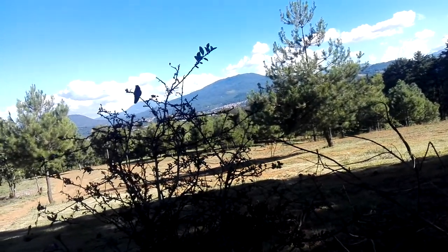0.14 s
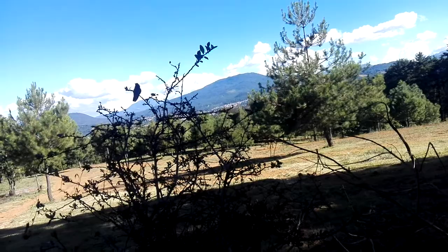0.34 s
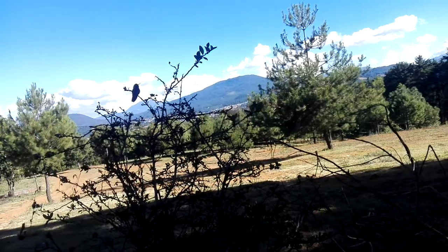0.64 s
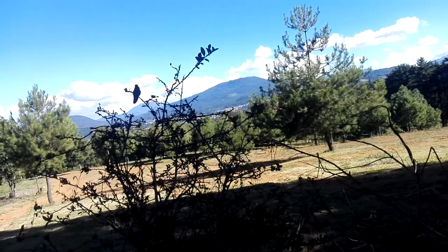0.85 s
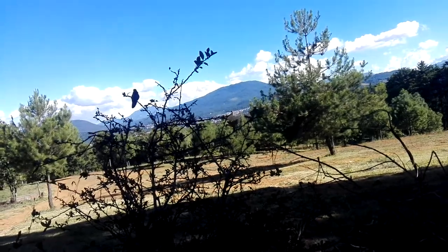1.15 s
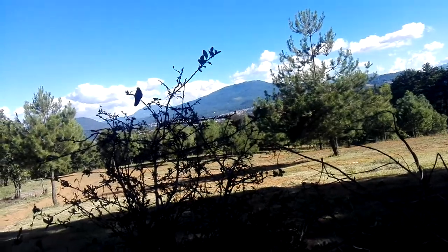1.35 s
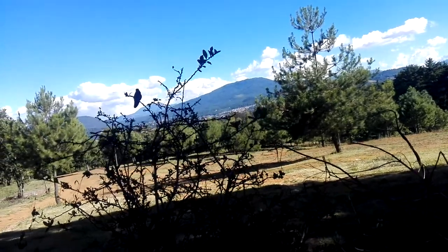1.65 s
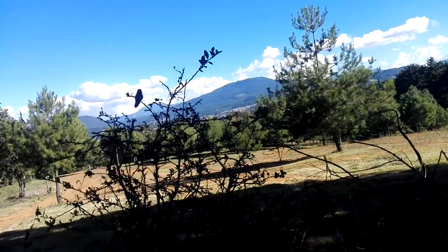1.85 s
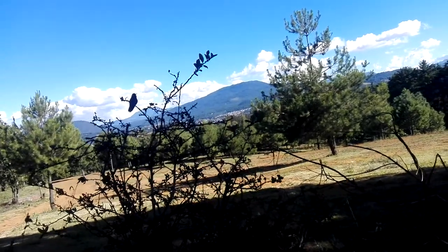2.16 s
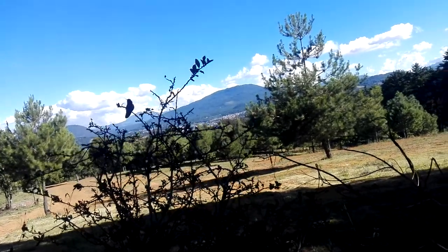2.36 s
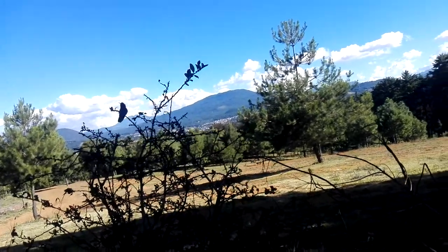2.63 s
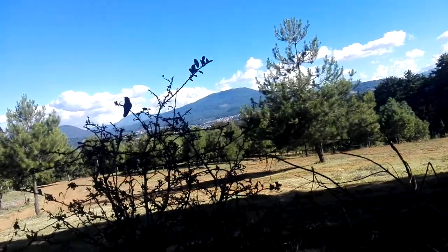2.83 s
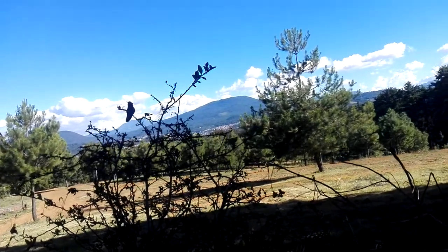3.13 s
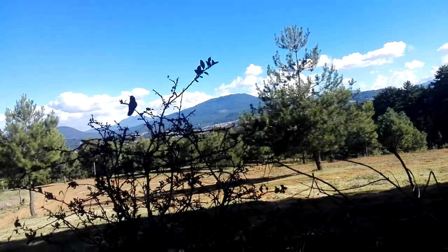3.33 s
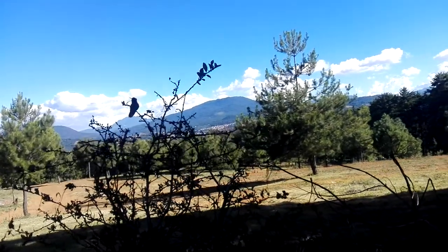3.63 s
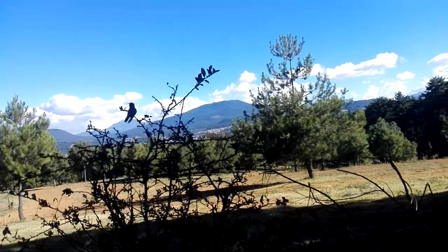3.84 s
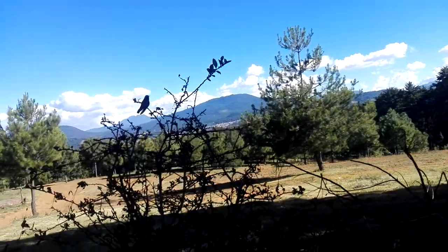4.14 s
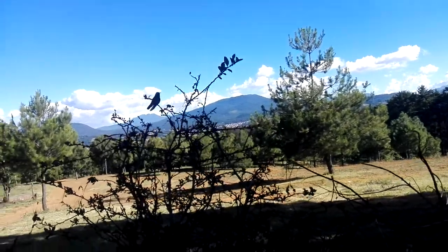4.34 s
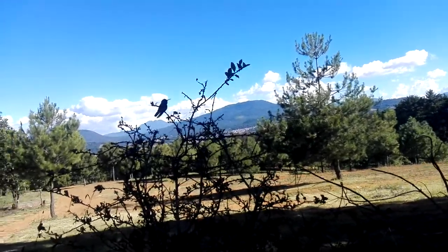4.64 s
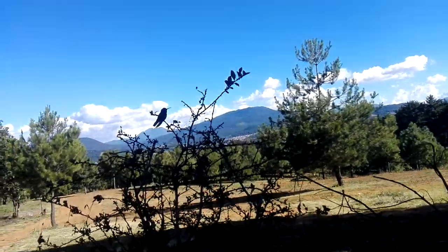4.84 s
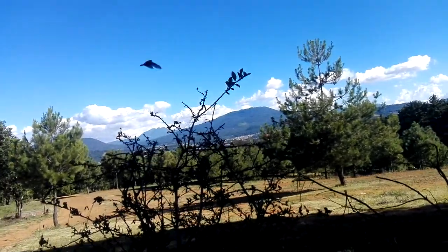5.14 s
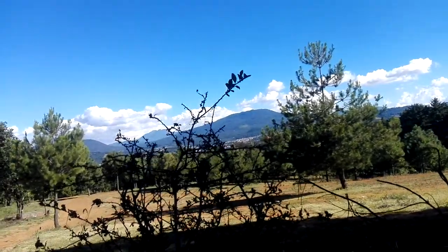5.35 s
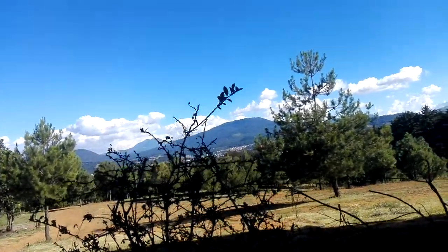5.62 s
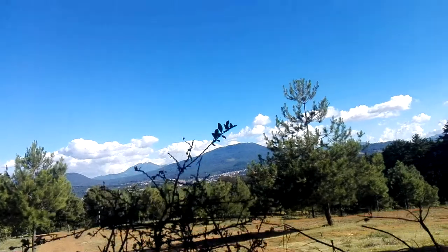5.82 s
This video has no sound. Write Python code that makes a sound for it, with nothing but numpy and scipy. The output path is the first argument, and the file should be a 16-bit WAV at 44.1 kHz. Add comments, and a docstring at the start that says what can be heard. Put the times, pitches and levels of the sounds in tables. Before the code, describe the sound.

Low wind rumbles on a hand-held microphone in open country while a small bird repeats thin, sharp double chips, eight pairs in all. Soft scuffs and one faint far-off knock sit beneath the calls. In the second half the chirping ends and clothing rustles lightly nearby, as the breeze builds into heavier buffeting with dull thumps.

```python
"""A breeze hums and thumps on a hand-held microphone, growing stronger as swirls of air peel off the case.
A hummingbird on a bush calls in pairs of sharp, falling chips, whistled by its tiny voice organ;
twigs and trees scatter each chip into a short tail. Soft scuffs sound close by, two faint far-off tones
come and go, and one distant knock rolls over the quiet hillside. Later a sleeve swishes as the arm moves."""
import sys
import numpy as np
from scipy import signal
from scipy.fft import rfft, irfft
from scipy.io import wavfile
from scipy.ndimage import uniform_filter1d

SR = 44100
rng = np.random.default_rng(int(sys.argv[2]) if len(sys.argv) > 2 else 0)


def persist_wave(psi):
    """Save psi, clipped to +-1, as 16-bit WAV."""
    counts = np.round(np.clip(psi, -1, 1) * 32767).astype(np.int16)
    wavfile.write(sys.argv[1], SR, np.atleast_2d(counts).T)


N = 263718
T = np.arange(N) / SR

# how rough the moving air is over time: time_s, level_db
AIR_ROUGHNESS = [(0.0, -71.5), (0.68, -74), (1.3, -64), (1.7, -67), (2.13, -56), (2.35, -57.5), (3.45, -63),
                 (3.73, -56), (3.98, -46.5), (4.41, -50), (4.78, -49.5), (4.91, -49.5), (5.56, -44),
                 (5.98, -47.5)]


def undb(db):
    """Turn decibels into a number to multiply a sound by."""
    return 10 ** (np.asarray(db) / 20)


def curve(table, at=T):
    """Read values off a two-column table, joining its points with straight lines."""
    return np.interp(at, *np.transpose(table))


def noise(spectrum):
    """Noise of strength 1 (rms), with its tone set by rows of frequency_hz, level_db."""
    hz, db = np.transpose(spectrum)
    bins_hz = np.maximum(np.fft.rfftfreq(N, 1 / SR), 1)
    gain = undb(np.interp(np.log(bins_hz), np.log(hz), db))
    x = irfft(rfft(rng.standard_normal(N)) * gain, N)
    return x / x.std()


def wander(rate_hz):
    """A smooth random wobble of typical size 1, heading for a new value rate_hz times a second."""
    hold = int(SR / rate_hz)
    steps = np.repeat(rng.standard_normal(N // hold + 1), hold)
    x = uniform_filter1d(uniform_filter1d(steps, hold), hold)[:N]
    return x / x.std()


def fade(start_s, fade_s, rise_s):
    """A loudness shape that rises quickly, then drops 60 dB every fade_s seconds."""
    age = np.maximum(T - start_s, 0)
    return (1 - np.exp(-age / rise_s)) * undb(-60 * age / fade_s)


def swell(start_s, length_s, db, db_per_s, attack_s, release_s):
    """The loudness of a gust or an arm movement: it builds, slowly grows or eases, then dies away."""
    age = T - start_s
    attack = np.clip(age / attack_s, 0, 1)
    release = np.exp(-np.maximum(age - length_s, 0) / release_s)
    return attack * release * undb(db + db_per_s * np.clip(age, 0, length_s))


def country_air(level_db=-74):
    """The faint, nearly steady hush of the open country."""
    # tone of the hush: frequency_hz, level_db
    hush_tone = [(100, 3.5), (300, 3.5), (600, 3), (900, 3.5), (1400, 1), (2300, -5), (3600, -4.5),
                 (7000, -7), (14000, -9.5)]
    return noise(hush_tone) * undb(level_db + 0.28 * wander(5.5))


def wind(lull_db=-54.5, drag_db=-22):
    """Swirls of air peel off the case and hum, higher in a faster breeze, over churning and rumbling."""
    # how fast the swirls peel off: time_s, pitch_hz
    hum_pitch = [(0.0, 48.1), (0.95, 50.37), (1.13, 68.5), (1.66, 58.16), (2.16, 72.25), (2.63, 67.4),
                 (2.8, 54.09), (3.23, 60.4), (3.7, 58.32), (4.63, 90.2), (5.35, 88.2), (5.51, 99.17),
                 (5.98, 90.2)]
    # gusts that hum on the case: start_s, length_s, level_db, swell_db_per_s
    gusts = [(0.136, 0.087, -39.5, 3), (0.313, 0.098, -33.5, -11), (0.466, 0.497, -40, 4),
             (1.028, 0.47, -31.5, -10), (1.565, 0.71, -34, 4), (2.339, 0.44, -33.5, -5.5),
             (2.878, 0.22, -40.5, 8), (3.249, 0.23, -39.5, 16), (3.714, 0.775, -38, 9),
             (4.483, 0.47, -27.5, 9), (5.018, 0.86, -26, -3.5)]
    # tone of the churning air: frequency_hz, level_db
    churn_tone = [(20, -9.5), (60, -6.5), (110, 11.5), (190, -4.5), (260, -20.5), (400, -38), (800, -68),
                  (2000, -91)]
    # tone of the small swirls: frequency_hz, level_db
    swirl_tone = [(100, -9), (280, 5.5), (420, -9), (700, -26), (2000, -60.5)]
    # tone of the deep rumble: frequency_hz, level_db
    rumble_tone = [(5, -4.5), (18, -13.5), (32, -3.5), (48, -13), (80, -13.5), (200, -75), (600, -110)]
    strength = np.max([swell(*gust, attack_s=0.062, release_s=0.031) for gust in gusts], axis=0)
    # the swirls are never regular: pitch and loudness stray every few cycles
    phase = 2 * np.pi * np.cumsum(curve(hum_pitch) * (1 + .12 * wander(60))) / SR
    throb = undb(2.8 * wander(45))
    # the air pushes sideways once a cycle and drags on the case twice a cycle
    push = np.sqrt(2) * (np.sin(phase) + undb(drag_db) * np.sin(2 * phase))
    hum = push * throb * np.maximum(strength, undb(lull_db))
    rough_db = curve(AIR_ROUGHNESS)
    gust_db = rough_db + 4.5 * wander(35)
    churn = noise(churn_tone) * undb(gust_db + 9)
    # small swirls follow the gusts closely, the rumble only about half as much
    usual_db = rough_db.mean()
    swirls = noise(swirl_tone) * undb(usual_db - 11 + 0.95 * (gust_db - usual_db))
    rumble = noise(rumble_tone) * undb(-38 + 0.56 * (gust_db - usual_db))
    return hum + churn + swirls + rumble


def wind_thumps(small_count=44, small_width_ms=1.36):
    """Single swirls strike the microphone's opening: a sharp suck of air with a slower rebound."""
    # the main thumps: time_s, level_db, width_ms
    main_thumps = [(1.61, -19, 2.8), (1.663, -25.5, 1.33), (2.42, -23.5, 1.22), (2.509, -26.5, 1),
                   (2.761, -22.5, 1.25), (3.162, -30.5, 1.42), (3.429, -20.5, 1.58), (3.452, -20.5, 1.19),
                   (3.899, -23, 0.71), (4.082, -17.5, 1.25), (4.125, -27, 0.43), (4.152, -22, 0.79),
                   (4.277, -24.5, 0.71), (4.307, -15.5, 1.28), (5.375, -17, 0.79), (5.649, -18, 0.72),
                   (5.67, -18.5, 0.73), (5.944, -23, 1.07)]
    # smaller ones come at random, louder when the air is rougher
    times = (np.arange(small_count) + rng.random(small_count)) * T[-1] / small_count
    levels = curve(AIR_ROUGHNESS, times) + 17.5 + 3.5 * rng.standard_normal(small_count)
    small_thumps = [(time_s, db, small_width_ms) for time_s, db in zip(times, levels)]
    out = np.zeros(N)
    for time_s, db, width_ms in list(main_thumps) + small_thumps:
        near = np.abs(T - time_s) < .03
        offset = 1000 * (T[near] - time_s) / width_ms
        out[near] -= undb(db) * (np.exp(-offset ** 2 / 2) - .3 * np.exp(-offset ** 2 / 12))
    return out


def chip(ms, hz, lead_ms, length_ms, sag_db, blips_db):
    """A thin whistle snaps down an octave and fades; the voice organ ends it with two higher blips."""
    # the whistle's slide: time_from_peak_ms, pitch_ratio
    slide = [(-5, 2.52), (-2, 2.4), (-1.2, 2.32), (-.8, 2.17), (-.25, 1.57), (.1, 1.31), (.5, 1.22),
             (2, 1.1), (5, 1.0), (8, .93), (13, .88)]
    # how the whistle starts: time_from_peak_ms, level_db
    attack = [(-5, -22), (-1.6, -13), (-1.2, -10), (-.6, -9), (0, -.5), (.4, 0), (1.8, -2)]
    pitch = uniform_filter1d(curve(slide, ms), size=11)
    pitch += .25 * np.clip((ms - length_ms + 1) / 2.2, 0, 1)  # flicks back up as the note closes
    grid_ms = np.linspace(ms[0], ms[-1], 64)
    flutter, waver = (np.interp(ms, grid_ms, row) for row in rng.standard_normal((2, 64)))
    phase = 2 * np.pi * np.cumsum(hz * pitch * (1 + .012 * waver)) / SR
    settled = 1 - np.exp(-np.maximum(ms - .4, 0) / 6)
    fall_db = settled * (sag_db + 2 * flutter)
    opening = np.clip((ms + lead_ms + .5) / .9, 0, 1)
    closing = np.clip((length_ms + .9 - ms) / 2.6, 0, 1)
    loudness = undb(curve(attack, ms)) * np.sin(np.pi / 2 * opening * closing) ** 2
    blips = sum(undb(db) * np.exp(-((ms - length_ms - lag_ms) / .85) ** 2)
                for db, lag_ms in zip(blips_db, (1.6, 4.5)))
    voice = (loudness * undb(fall_db) + blips) * np.sin(phase)
    # overtones fade more slowly, and only sound once they are low enough to pass through the beak
    for multiple, top_hz, db in [(2, 9500, -5.5 + 0.97 * fall_db), (3, 13100, -23 + 0.33 * fall_db)]:
        beak = 1 / np.sqrt(1 + (multiple * hz * pitch / top_hz) ** 20)
        voice += (loudness + blips) * undb(db) * beak * np.sin(multiple * phase)
    return voice * np.sqrt(2)


def hummingbird(second_boost_db=0.8, second_drop_hz=45):
    """Chips come in pairs, long then short; so small a throat gives out nothing below the note."""
    # pairs of chips: time_s, gap_s, level_db, base_pitch_hz, extra_length_ms, blip_boost_db,
    # first_lead_in_ms, second_lead_in_ms
    pairs = [(0.2461, 0.095, -28.3, 4370, .1, -1, 1.4, 2.3), (0.8263, 0.1, -28, 4340, -0.26, -1, 1.85, 1.8),
             (1.1665, .1011, -27.5, 4330, 0.13, 1, 1.4, 5.5), (1.5482, 0.097, -27, 4344, 1.6, 0, 4.1, 2.5),
             (1.8922, 0.095, -28, 4380, -.6, 2.5, 1.35, 1.16),
             (2.3857, 0.1026, -28.9, 4220, -0.31, -4, 1.62, 0.86),
             (2.8839, 0.098, -29, 4300, -0.63, -1, 0.74, 2.8),
             (3.7, 0.1, -29, 4320, -0.52, -6, 1.42, 1.094)]
    # the first and second chip of a pair: length_ms, sag_db, first_blip_db, second_blip_db
    chip_shapes = [(16.1, -16, -24.5, -29), (12.3, -21.5, -16, -25.5)]
    out = np.zeros(N)
    for time_s, gap_s, db, hz, extra_ms, blip_boost_db, *leads_ms in pairs:
        for is_second, (length_ms, sag_db, *blips_db) in enumerate(chip_shapes):
            peak_s = time_s + is_second * gap_s
            stray_db = 2 * rng.standard_normal(2)
            near = (T > peak_s - .007) & (T < peak_s + .026)
            note = chip(1000 * (T[near] - peak_s), hz - is_second * second_drop_hz, leads_ms[is_second],
                        length_ms + extra_ms, sag_db, blips_db + stray_db + blip_boost_db)
            out[near] += undb(db + is_second * second_boost_db) * note
    return signal.sosfilt(signal.butter(10, 3450, "high", fs=SR, output="sos"), out)


def hillside_echo(call, twigs_db=-20, trees_db=-24):
    """Twigs scatter the call at once, the trees behind a little later; both favour the high notes."""
    bright_call = signal.lfilter([1, -1], [1], call)
    twigs = fade(.001, fade_s=.06, rise_s=.0005)
    trees = fade(.0027, fade_s=.19, rise_s=.0015)
    out = call
    for db, shape in [(twigs_db, twigs), (trees_db, trees)]:
        echoes = (rng.standard_normal(N) * shape)[:SR // 2]
        out = out + undb(db) * signal.fftconvolve(bright_call, echoes / np.linalg.norm(echoes))[:N]
    return out


def scuffs():
    """Now and then something close by softly scuffs or ticks: a short, grainy burst of noise."""
    # light touches: start_s, level_db, fade_s
    touches = [(1.888, -58.5, 0.039), (1.933, -66, 0.48), (1.973, -60.5, 0.13), (2.001, -62.5, 0.19),
               (3.039, -63, .04), (4.032, -54, 0.029), (4.053, -57.5, 0.29), (4.661, -62, .17)]
    # tone of a scuff: frequency_hz, level_db
    scuff_tone = [(200, -24.5), (800, 5), (1600, -1), (2600, -11.5), (5000, -7.5), (12000, -18.5)]
    loudness = sum(undb(db) * fade(start_s, fade_s, rise_s=0.00024) for start_s, db, fade_s in touches)
    return noise(scuff_tone) * loudness * undb(3.8 * wander(250))


def far_tones():
    """Two faint, wavering tones come and go in the distance."""
    out = np.zeros(N)
    for peak_s, width_s, hz, db in [(2.7, 0.92, 502.2, -76.5), (5.2, 0.37, 876, -81.5)]:
        phase = 2 * np.pi * np.cumsum(hz * (1 + 0.04 * wander(55))) / SR
        out += undb(db) * np.exp(-((T - peak_s) / width_s) ** 2) * np.sin(phase)
    return out


def far_knock(start_s=2.844, blow_db=-45.5, roll_db=-60):
    """A distant blow, dulled by the air, and its longer roll through the woods."""
    # tone of the blow: frequency_hz, level_db
    blow_tone = [(150, 2), (350, -12.5), (560, -19), (950, -5.5), (1400, -19), (1750, -21.5), (2400, -43),
                 (5000, -48)]
    roll_tone = [(200, -30), (500, -1.5), (950, 1.5), (1500, -10), (2500, -20), (6000, -56)]
    soft_start = np.clip((T - start_s) / .006, 0, 1)
    blow_shape = soft_start * fade(start_s, fade_s=0.35, rise_s=0.002)
    roll_shape = fade(start_s, fade_s=1.107, rise_s=0.0097)
    blow = noise(blow_tone) * undb(blow_db + 2 * wander(90)) * blow_shape
    roll = noise(roll_tone) * undb(roll_db + 0.68 * wander(30)) * roll_shape
    return blow + roll


def sleeve():
    """Sleeve fabric slides with a grainy swish as the arm moves, and its creases crackle."""
    # tone of the sliding cloth: frequency_hz, level_db
    cloth_tone = [(400, -2), (1200, -6), (2200, -5.5), (3000, -2.5), (5200, -3), (6900, 1.5), (8400, -3.5),
                  (10800, -3.5), (12300, -10), (14000, -25.5)]
    # arm movements: start_s, length_s, level_db, swell_db_per_s, added_hiss_db
    strokes = [(3.651, .5, -63, -4, -3.5), (4.449, 0.5, -66, 12.5, -15.5)]
    # creases that crackle: start_s, level_db
    creases = [(3.915, -66), (4.06, -66), (4.854, -54), (4.92, -62), (4.951, -66.5)]
    fabric = noise(cloth_tone)
    hiss = noise([(5000, -17.5), (10000, -5), (14000, -5.5)])
    swish = sum(swell(*motion, attack_s=0.15, release_s=0.083) * (fabric + undb(hiss_db) * hiss)
                for *motion, hiss_db in strokes)
    snaps = sum(undb(db) * fade(start_s, fade_s=0.054, rise_s=0.00046) for start_s, db in creases)
    grain = undb(5 * wander(800))
    crackle = noise([(600, -18), (1800, 7), (6000, 0), (12000, 0), (15000, -5.5)]) * snaps * grain
    return swish * undb(1.5 * wander(300)) + crackle


def scene():
    """Bird, wind and surroundings add up at one microphone."""
    nearby = hillside_echo(hummingbird()) + wind() + wind_thumps() + sleeve() + scuffs()
    distant = far_knock() + country_air() + far_tones()
    return (nearby + distant)[None]


def record(dry, top_hz=14250):
    """The recorder cuts off the very highest sounds."""
    return signal.sosfilt(signal.ellip(10, .2, 70, top_hz, fs=SR, output="sos"), dry)


dry = scene()
out = record(dry)
persist_wave(out)
```